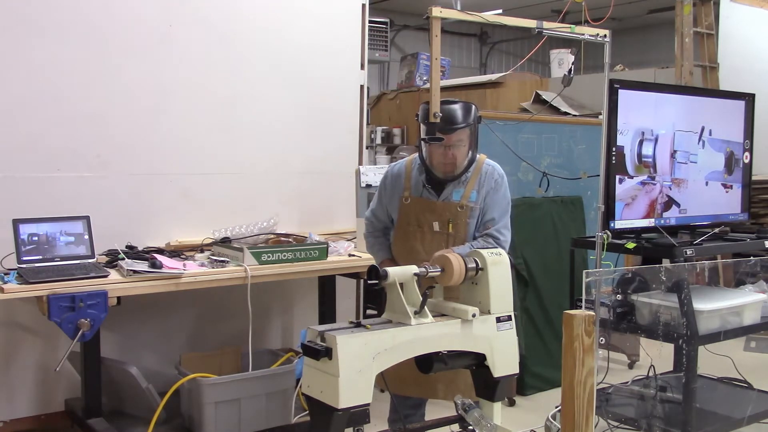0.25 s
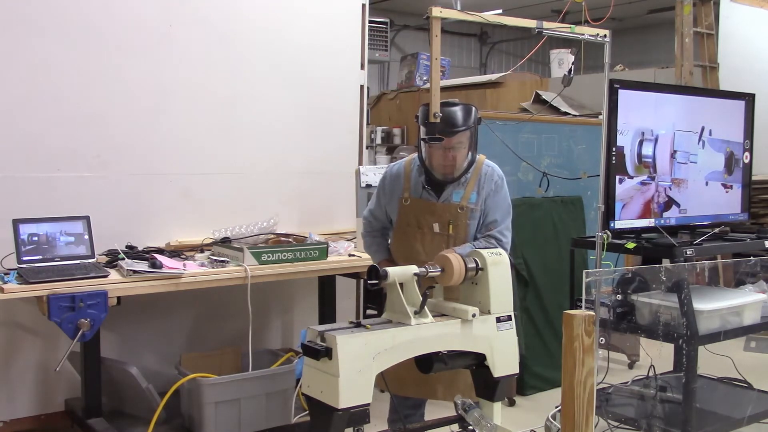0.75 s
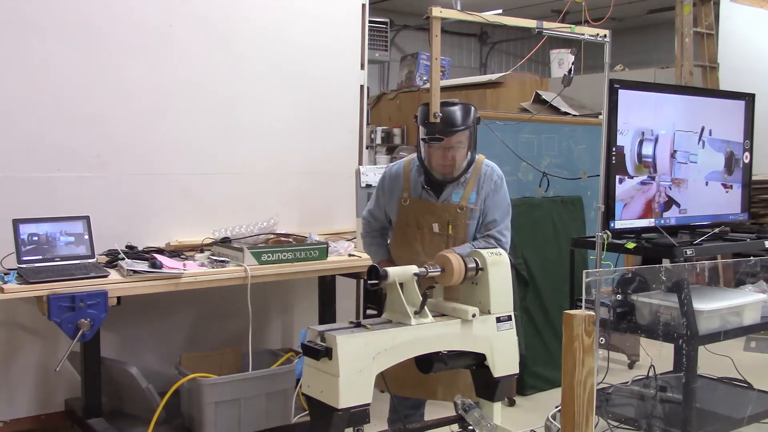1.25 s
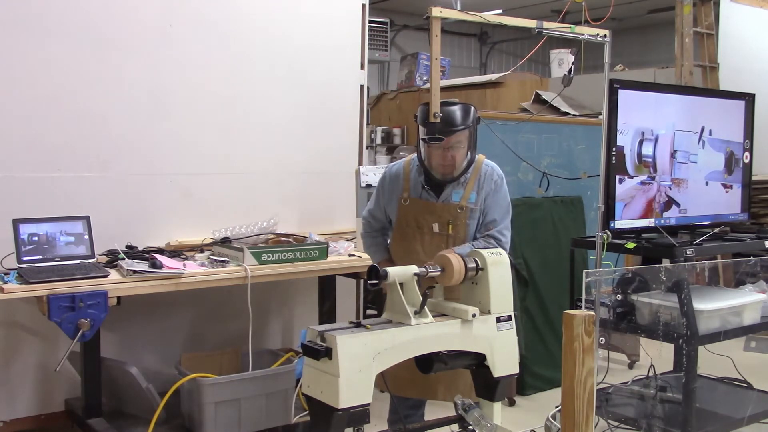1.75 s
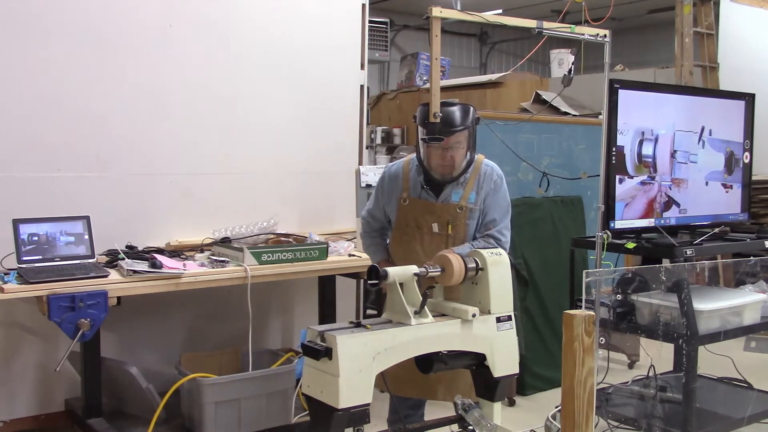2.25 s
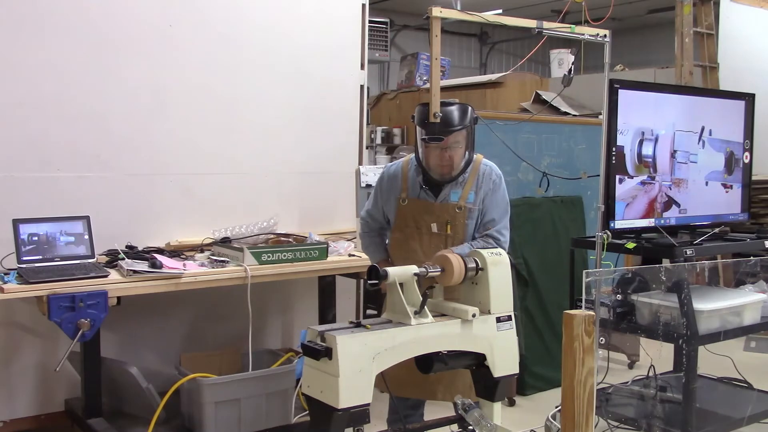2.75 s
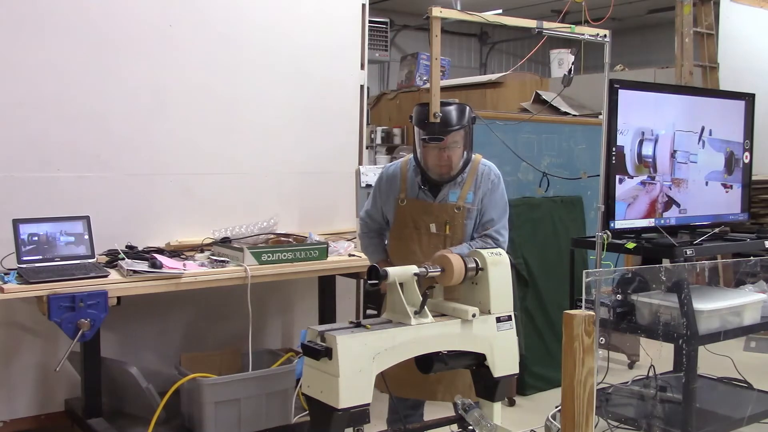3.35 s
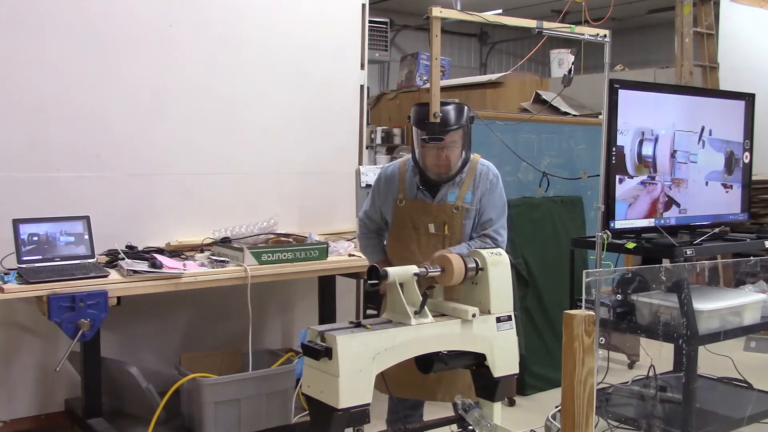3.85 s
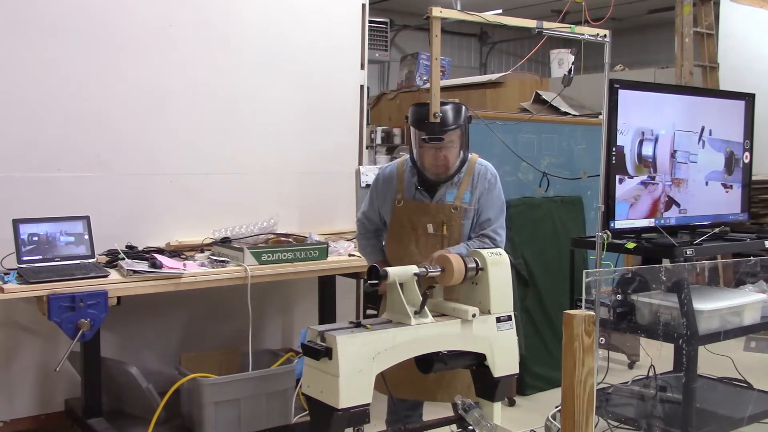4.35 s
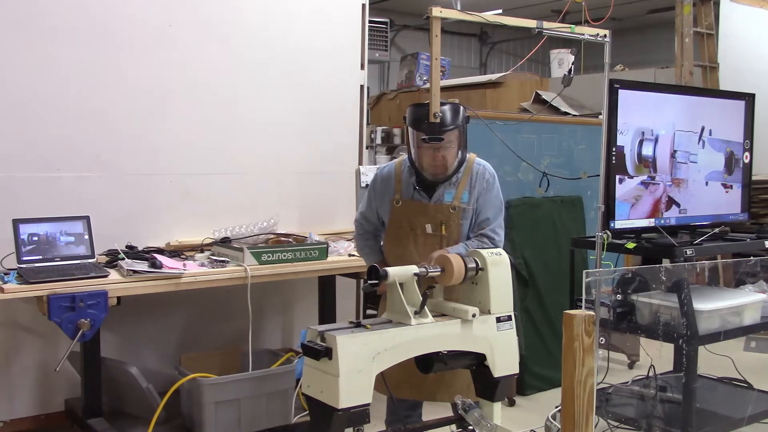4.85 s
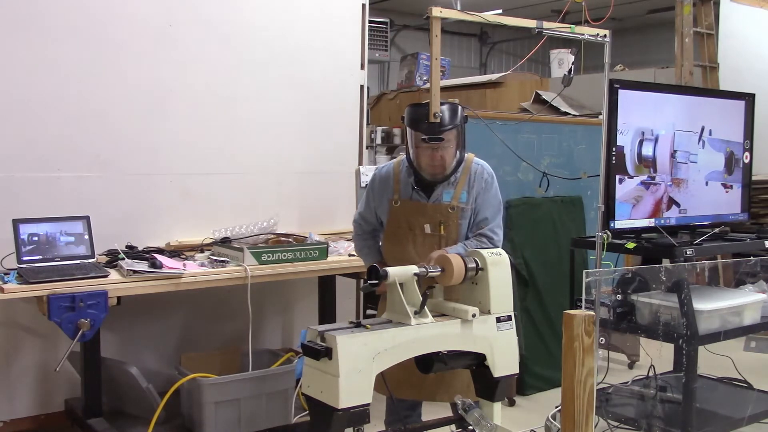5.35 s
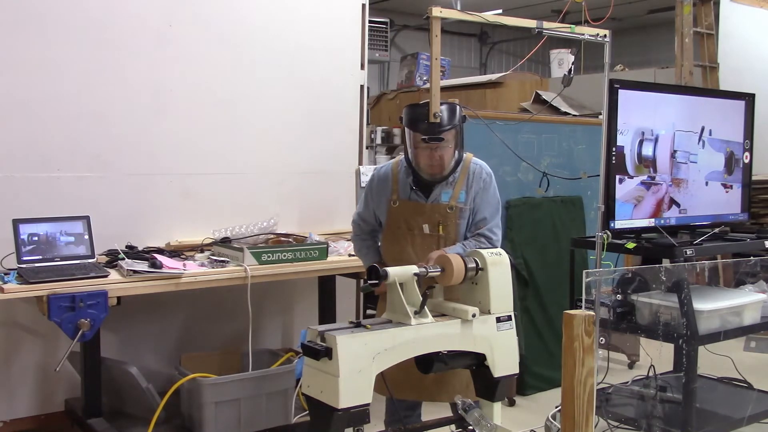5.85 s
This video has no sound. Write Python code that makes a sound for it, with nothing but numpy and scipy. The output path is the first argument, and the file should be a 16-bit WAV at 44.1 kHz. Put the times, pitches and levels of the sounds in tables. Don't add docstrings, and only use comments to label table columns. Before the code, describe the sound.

Heard from a few metres by a nearly centred microphone, a gouge scrapes a spinning wooden blank. A short burst of cutting lifts into half a second of room ringing and steady motor noise, then harsh continuous cutting resumes. Steel rings, wood buzzes and shavings hiss in a fast throb that drops in speed mid-way and recovers. Thuds and cracks cluster in the middle; the tool rest hums toward the end.

```python
import sys
import numpy as np
from scipy import signal
from scipy.fft import rfft, irfft, next_fast_len
from scipy.io import wavfile
from scipy.ndimage import uniform_filter1d, map_coordinates

SR = 44100
rng = np.random.default_rng(int(sys.argv[2]) if len(sys.argv) > 2 else 0)


def wav_record(signal):
    frames = np.transpose(np.atleast_2d(signal))
    bounded = np.clip(frames, -1, 1)
    quanta = np.round(bounded * 32767).astype(np.int16)
    wavfile.write(sys.argv[1], SR, quanta)


def rack_gain(trim_db):
    fader = np.asarray(trim_db, float)
    return 10 ** (fader / 20)


N = 269892

# pitch_hz, level_db (per Hz)
IDLE_COLOUR = [(18, -70), (30, -40), (97, -16), (120, 0.5), (140, -6), (156, -15), (315, 5), (467, -11),
               (518, -9.5), (852, -5), (1230, -12), (2020, -10.5), (3230, -32), (5740, -28), (15500, -57)]
IDLE_DB = -37
# pitch_hz, time_to_fade_60_db_s
ROOM_FADE = [(100, 0.43), (500, 1.15), (2000, 1.1), (3400, 1.03), (5000, 0.79), (8000, 0.44), (12000, 0.56)]
# pitch_hz, side_minus_mid_db
STEREO_WIDTH = [(30, -45), (100, -27), (500, -28), (1300, -23), (2400, -19), (5000, -14), (10800, -10),
                (13000, -17)]
# time_s, pitch_hz, level_db
REST_HUM = [(3.9, 69.5, -43), (4.5, 69.3, -42), (5.0, 70.5, -43), (5.5, 71, -36), (5.6, 68.3, -39),
            (6.12, 70.6, -35)]
# multiple_of_pitch, level_db
HUM_OVERTONES = [(4, -2.5), (5, -3), (6, -1.5), (7, 3)]
# start_s, thud_db, crack_db
CATCHES = [(0.715, -39, -21), (0.735, -31.5, -19.5), (0.769, -35, -33), (1.749, -49, -38),
           (2.003, -28, -40), (2.09, -33, -26), (2.318, -28, -25.5), (2.599, -30, -25), (2.7, -29, -36),
           (2.745, -33, -21), (2.96, -37, -33), (3.099, -36, -42), (3.269, -29, -40), (4.974, -46, -44),
           (5.637, -37, -25)]
# time_s, turns_per_s
SPINDLE_SPEED = [
    (0, 20),
    (.4, 22),
    (.7, 21.8),
    (1.15, 19.8),
    (1.7, 17.6),
    (3.2, 17.4),
    (3.7, 21),
    (4.2, 21.6),
    (5.2, 21.4),
    (6.12, 22.8),
]
# time_s, place (0 to 4.5)
TOOL_PATH = [(0, 0), (.4, 0.4), (.7, 1), (1.15, 1), (1.7, 1.4), (2.5, 2), (3.2, 2.5), (3.7, 3), (4.5, 3),
             (5.2, 4), (6.12, 4.5)]
# time_s, then bed_db, blank_db, tool_db, shavings_db under the full bite
GRAZE = [
    (.688, -30, -27, -32, -22),
    (.71, -16, -12, -11, -8),
]
FIRST_PASS_DB, LIFT_S = -11.5, 0.163
# time_s, depth_of_cut_db
CUT_DEPTH = [(0.72, -14), (0.9, -14.6), (1.15, -13.8), (1.55, -12.2), (1.9, -13), (2.22, -14), (2.6, -13.6),
             (3.0, -13.8), (3.28, -12.6), (3.42, -16.2), (3.8, -15), (4.15, -13.6), (4.7, -14.4),
             (5.05, -13), (5.55, -13.5), (5.75, -14.8), (6.12, -14)]
DEPTH_GROWTH = (.9, 1.0, 1.1, 1.0)
# bed_db, blank_db, tool_db, shavings_db
PART_LEVELS = [(-9.5, -6.5, -2.5, -16), (-17.5, -5, 0, -12), (-15.5, -6.5, -0.97, -16.5),
               (-16.5, -4.5, -1, -14.5), (-13.5, -4, -1.5, -13)]
# throb_once_a_turn_db, throb_twice_a_turn_db
GRAIN_THROB = [(4, 2), (2.5, 3), (2, 4), (1.7, 3), (3.5, -3.5)]
# pitch_hz, width_hz, level_db
GOUGE_RINGS = [
    [(3430, 60, -13), (4440, 69, 1), (4920, 120, -2), (5120, 66, -5), (5530, 180, 2.5), (5940, 96, 2.5),
     (6520, 110, -6), (7110, 180, -2.7)],
    [(3017, 116, -5), (3407, 31, -1.5), (4315, 180, 0), (4794, 143, 6), (5600, 120, -2.5), (6230, 73, -6),
     (7340, 72, -38), (7630, 91, -16)],
    [(3010, 110, -3.5), (4540, 270, 3.5), (4810, 99, 5.5), (5040, 123, 6.5), (5540, 140, 5),
     (6050, 70, 2.5), (6540, 82, 0.5), (7020, 85, 2.5)],
    [(2960, 82, -5.5), (3250, 48, -2), (3920, 65, -8), (4320, 100, -0.5), (5040, 130, 0), (5700, 130, -3.5),
     (6580, 46.4, -4), (7050, 49, -6.5)],
    [(2940, 140, -5.5), (3300, 42, -3), (3940, 32, 0.5), (4390, 82, -4.5), (5030, 51, 0.5),
     (5460, 130, -4.5), (6040, 180, 0), (6880, 41, -6)],
]
# pitch_hz, width_hz, level_db
BLANK_RINGS = [
    [(780, 93, -3), (1190, 50, -7), (1584, 100, -4.5), (1700, 45, -13)],
    [(724, 46, -3.5), (847, 16, 3.5), (1114, 20, -25), (1387, 61, -6), (1663, 156, -5), (1894, 210, -4)],
    [(746, 40, -1.5), (849, 45, -4.5), (1123, 105, -4), (1360, 61, -12), (1592, 61, -4), (1744, 54, -2),
     (1830, 160, -12)],
    [(748, 72, -3), (864, 46, -6), (1137, 66, -6.5), (1800, 126, -4), (2050, 75, -6), (2290, 40, -8)],
    [(739, 16, -4.5), (862, 30, -3), (1145, 100, -10.5), (1800, 96, -3), (2044, 39, -2.5), (2280, 40, -5)],
]
# pitch_hz, width_hz, level_db
CHUCK_RING = (823, 13, 5)
# pitch_hz, width_hz, level_db
BED_RINGS = [
    [(107, 75, -5), (322, 15, 6.5), (373, 41, 1), (545, 60, -9)],
    [(113, 23, -3.5), (240, 17, -6), (334, 42, -2), (541, 43, 4)],
    [(119, 87, -12.5), (253, 9.1, -14), (325, 57, -7), (520, 36, -2.5)],
    [(115, 120, -16), (249, 11, -17), (275, 13, -4), (546, 45, -11)],
    [(120, 72, -18), (250, 14, -8), (339.5, 17, -6.5), (436, 25, -7.5), (508, 26, -2.5)],
]
# pitch_hz, width_hz, level_db
EDGE_RINGS = [(8840, 200, -12), (9330, 200, -6), (10800, 220, -10), (12500, 200, -11)]
# pitch_hz, level_db (per Hz)
GOUGE_COLOUR = [(1500, -65), (2500, -11), (4000, -11.5), (5500, -11.5), (7300, -14), (8500, -26),
                (12000, -71)]
BLANK_COLOUR = [(300, -82), (600, -12.5), (1200, -11), (2000, -11), (2600, -26), (5000, -52)]
BED_COLOUR = [(25, -60), (55, -57), (75, -15), (200, -19), (260, -15), (550, -5.5), (750, -16.5),
              (1500, -38)]
SHAVINGS_COLOUR = [(3820, -14), (6500, -9), (7130, -7), (7450, -2), (8290, -3.5), (9190, -8), (10700, -7),
                   (11600, -12.5), (14500, -15.5), (15300, -17), (15700, -31)]


def unit(x):
    return x / np.sqrt(np.mean(x ** 2) + 1e-20)


def along(points, hz):
    point_hz, values = np.transpose(points)
    return np.interp(np.log(hz + 1), np.log(point_hz + 1), values)


def curves(rows):
    times, *columns = np.transpose(rows)
    return [np.interp(np.arange(N) / SR, times, column) for column in columns]


def wobble(rate):
    knots = rng.standard_normal(int(N * rate / SR) + 4)
    return map_coordinates(knots, [np.arange(N) * rate / SR])


def filtered(x, response):
    size = next_fast_len(N + SR // 2)
    return irfft(rfft(x, size) * response(np.fft.rfftfreq(size, 1 / SR)), size)[..., :N]


def idle():
    rush = filtered(rng.standard_normal((2, N)), lambda hz: rack_gain(along(IDLE_COLOUR, hz)))
    return rack_gain(IDLE_DB - 2.0 + 0.25 * wobble(30.0)) * unit(rush)


def shop(x, count=4):
    before = [x[:SR // 8][::-1]] * 4
    earlier = np.concatenate(before + [x])
    stance, wet = np.linspace(0, count - 1, len(earlier)), 0
    for k in range(count):
        hz, t, z = signal.stft(rng.standard_normal((2, SR)), SR, nperseg=256)
        fading = z * rack_gain(-60 * t / along(ROOM_FADE, hz)[:, None])
        tail = signal.istft(fading, SR, nperseg=256)[1]
        tail = tail / np.linalg.norm(tail[0])
        share = np.sqrt(np.clip(1 - np.abs(stance - k), 0, 1))
        wet = wet + signal.fftconvolve(share * earlier[None], tail, axes=1)
    return wet[:, 4 * (SR // 8) - 400:][:, :N]


def hum():
    first_s, first_hz = REST_HUM[0][:2]
    hz, level_db = curves([(first_s - .4, first_hz, -70), *REST_HUM])
    phase = 2 * np.pi * np.cumsum(hz * (1 + 0.00402 * wobble(6))) / SR
    return sum(rack_gain(level_db + db + 4.8 * wobble(3.7)) * np.sin(k * phase) for k, db in HUM_OVERTONES)


def catches():
    out, t = np.zeros(N + SR), np.arange(SR // 10) / SR
    for start_s, thud_db, crack_db in CATCHES:
        stand = np.sin(2 * np.pi * 112 * t) + 1.38 * np.sin(2 * np.pi * rng.uniform(170, 191) * t)
        thud = rack_gain(thud_db + 7.5 - 60 * t / .06) * (1 - np.exp(-t / .004)) * stand
        rough = 0.67 * np.cumsum(rng.standard_normal(len(t))) / 4
        crack = rack_gain(crack_db + 11 - 60 * t / 0.042) * np.sin(2 * np.pi * 3000 * t + rough)
        out[round(start_s * SR):][:len(t)] += thud + crack
    return out[:N]


def fibres(per_s, spread_db):
    size = rack_gain(spread_db * rng.exponential(size=N)) * rng.standard_normal(N)
    return unit(size * (rng.random(N) < per_s / SR))


def bites(per_s, depth_db, fade_s):
    hits = np.minimum(rng.exponential(size=N), 1.3) * (rng.random(N) < per_s / SR)
    t = np.arange(SR // 10) / SR
    jumps = signal.fftconvolve(hits, np.exp(-t / fade_s) * (1 - np.exp(-t / 0.0009)))[:N]
    return depth_db * (jumps - uniform_filter1d(jumps, size=SR // 6))


def patchy(x, depth_db):
    z = signal.stft(x, nperseg=1024)[2]
    field = uniform_filter1d(rng.standard_normal(z.shape), 4, 0)
    field = uniform_filter1d(field, 14, 1)
    return signal.istft(z * rack_gain(depth_db * unit(field)), nperseg=1024)[1][:N]


def ringing(modes, hz):
    total = 0
    for i, (pitch, width, db) in enumerate(modes):
        damping = 1j * hz * width
        total = total + (-1) ** i * rack_gain(db) * damping / (pitch * pitch - hz * hz + damping)
    return total


def body(sets, colour, place, per_s, spread_db):
    out = filtered(fibres(per_s, spread_db), lambda hz: rack_gain(along(colour, hz)))
    for k, modes in enumerate(sets):
        share = np.sqrt(np.clip(1 - np.abs(place - k), 0, 1))
        out = out + share * filtered(fibres(per_s, spread_db), lambda hz: ringing(modes, hz))
    out = patchy(out, depth_db=1.4)
    return out / np.sqrt(uniform_filter1d(out ** 2, SR))


def part_levels(place, lift_s=0.015, off_db=-35):
    depth_db, = curves([(0, FIRST_PASS_DB), (LIFT_S, FIRST_PASS_DB), *CUT_DEPTH])
    mean_db = depth_db.mean()
    contact = curves([(LIFT_S, 0, 0, 0, 0), (LIFT_S + lift_s, *[off_db] * 4), *GRAZE,
                      (CUT_DEPTH[0][0], 0, 0, 0, 0)])
    answer = at_place(PART_LEVELS, place)
    return [mean_db + grows * (depth_db - mean_db) + answer_db + contact_db
            for grows, answer_db, contact_db in zip(DEPTH_GROWTH, answer, contact)]


def at_place(table, place):
    return [np.interp(place, np.arange(len(table)), column) for column in np.transpose(table)]


def cut():
    (speed,), (place,) = curves(SPINDLE_SPEED), curves(TOOL_PATH)
    bed_db, blank_db, tool_db, shavings_db = part_levels(place)
    once_db, twice_db = at_place(GRAIN_THROB, place)
    angle = 2 * np.pi * np.cumsum(speed) / SR

    def tooth(a):
        return np.cos(a) - .35 * np.sin(2 * a)

    def throb(once, twice, lag):
        return once * once_db * tooth(angle - lag) + twice * twice_db * tooth(2 * angle - 1.8 * lag)

    hand = .35 * wobble(11) + .5 * wobble(40) + bites(per_s=30, depth_db=2.2, fade_s=.014)

    tool_db = tool_db + throb(0.73, 0.39, lag=0.59) + 0.16 * np.cos(4 * angle - .4)
    tool_db = tool_db + hand + 0.3 * wobble(12)
    tool = rack_gain(tool_db) * body(GOUGE_RINGS, GOUGE_COLOUR, place, per_s=12000, spread_db=1.94)

    blank_db = blank_db + throb(0.64, 0.99, lag=0.99) + hand + 0.45 * wobble(9)
    with_chuck = [[*modes, CHUCK_RING] for modes in BLANK_RINGS]
    blank = rack_gain(blank_db) * body(with_chuck, BLANK_COLOUR, place, per_s=6000, spread_db=1.52)

    bed_db = bed_db + throb(1.0, 0.63, lag=0.41) + 1.2 * hand + 0.7 * wobble(8)
    bed = rack_gain(bed_db) * body(BED_RINGS, BED_COLOUR, place, per_s=2500, spread_db=1.47)

    shavings_db = shavings_db + throb(0.77, 0.27, lag=0.26) + 1.3 * np.cos(4 * angle - .6)
    shavings_db = shavings_db + hand + 0.66 * wobble(36)
    spray = rack_gain(shavings_db) * body([EDGE_RINGS], SHAVINGS_COLOUR, 0, per_s=24000, spread_db=1.6)
    return tool + blank + bed + spray


def scene():
    lathe, knocks = rack_gain(-3.0) * cut(), catches()
    wet, floor = shop(lathe + rack_gain(-5) * knocks), idle()
    mid = lathe + knocks + hum() + rack_gain(-2.5) * wet[0] + floor[0]
    side = filtered(wet[1] + floor[1], lambda hz: rack_gain(along(STEREO_WIDTH, hz)))
    return np.array([mid + side, mid - side])


def roll_off(x):
    return signal.sosfilt(signal.butter(12, 15850, fs=SR, output="sos"), x)


def record(dry):
    thin = filtered(dry, lambda hz: (1j * hz / (55 + 1j * hz)) ** 3)
    limited = thin / (1 + np.abs(thin / .88) ** 6) ** (1 / 6)
    return roll_off(limited)


dry = scene()
out = record(dry)
wav_record(out)
```